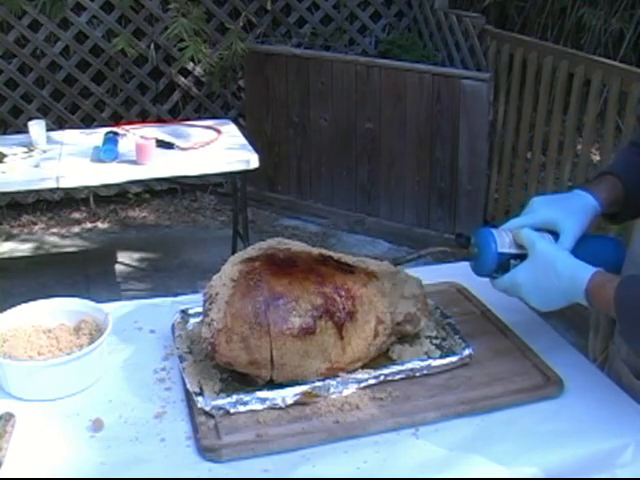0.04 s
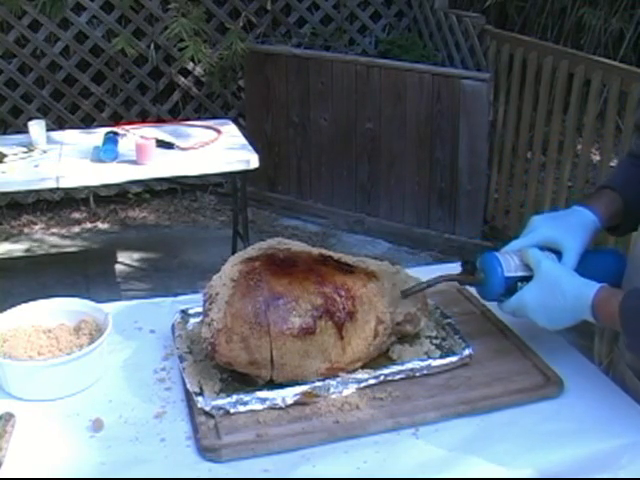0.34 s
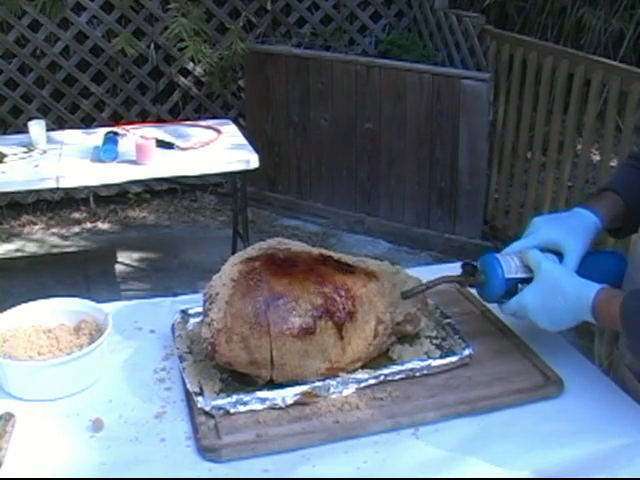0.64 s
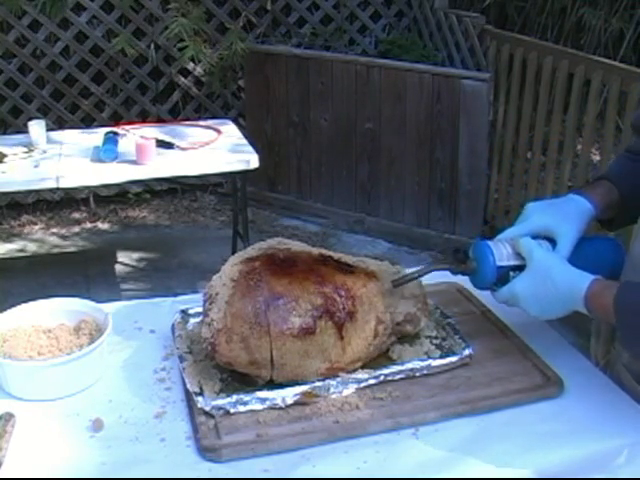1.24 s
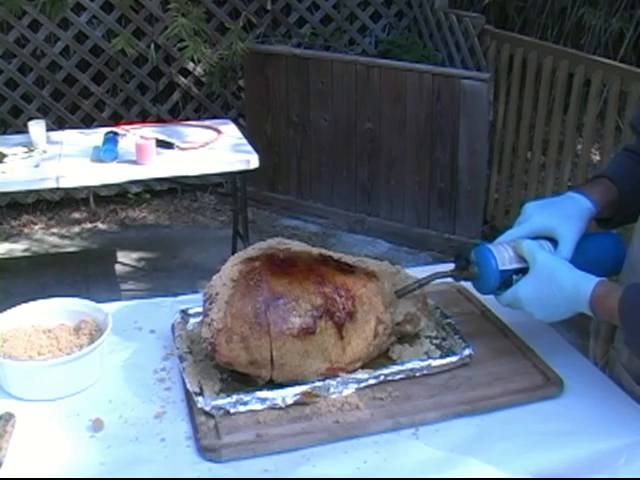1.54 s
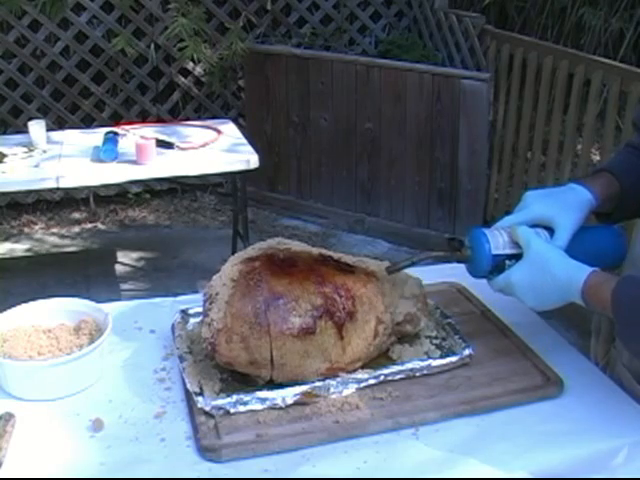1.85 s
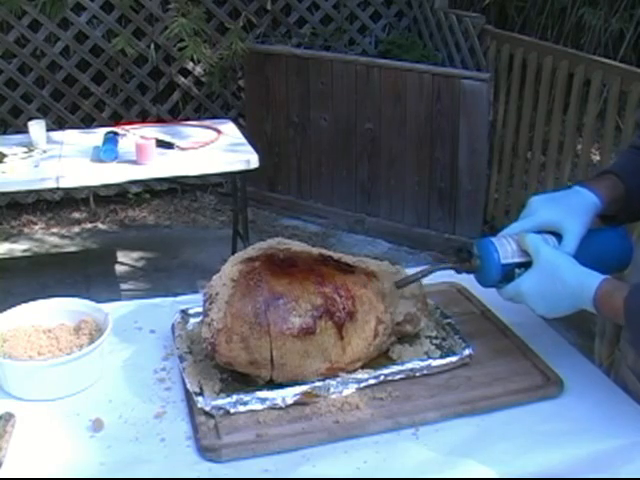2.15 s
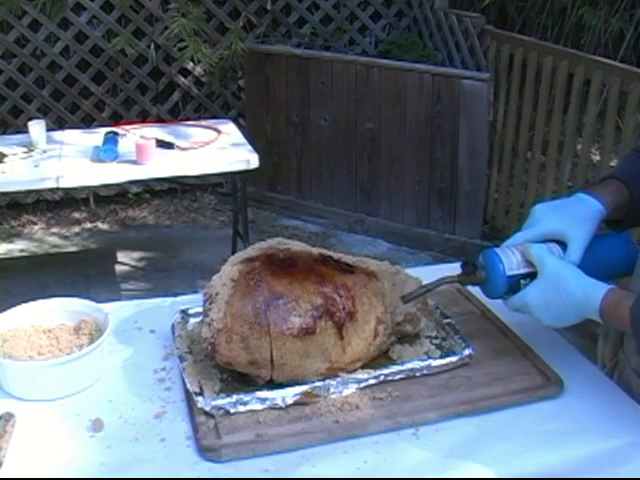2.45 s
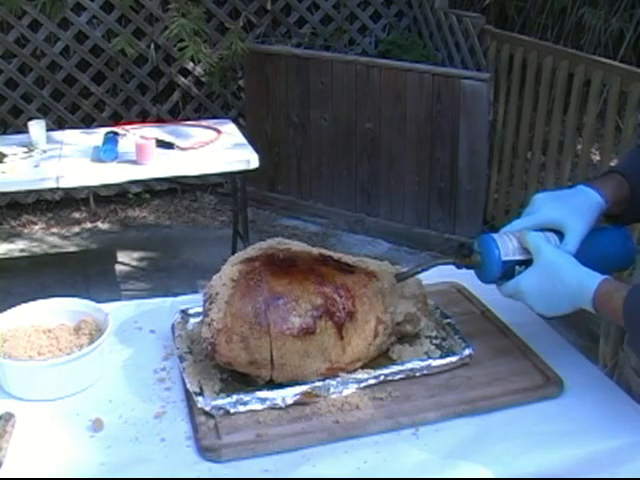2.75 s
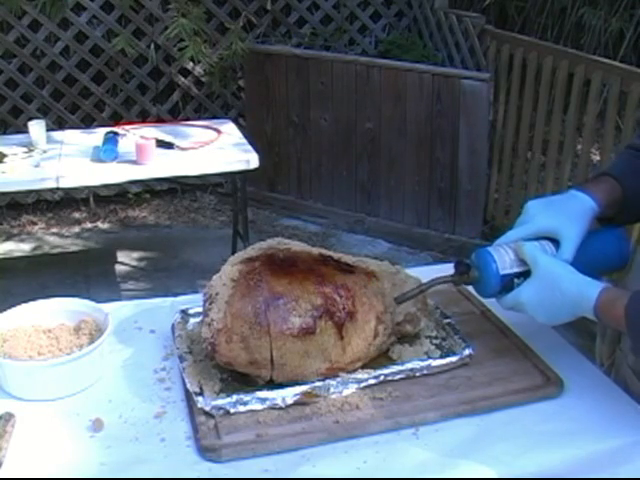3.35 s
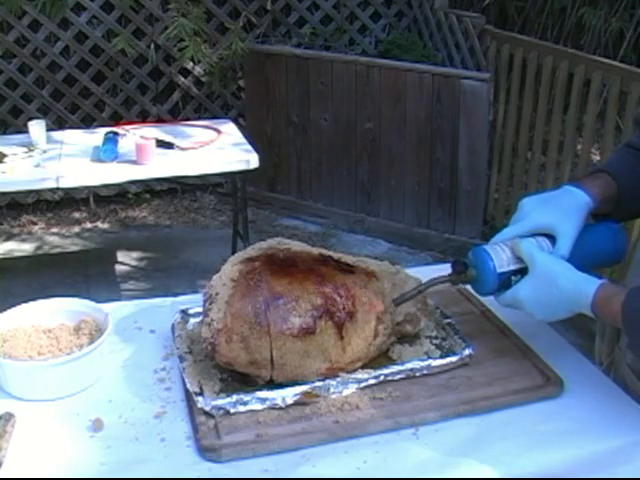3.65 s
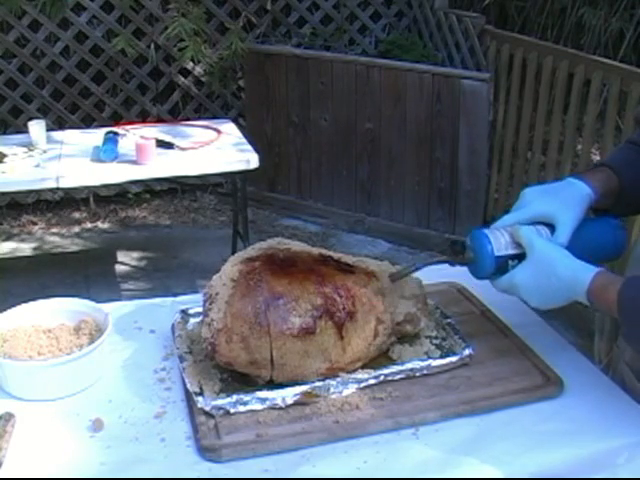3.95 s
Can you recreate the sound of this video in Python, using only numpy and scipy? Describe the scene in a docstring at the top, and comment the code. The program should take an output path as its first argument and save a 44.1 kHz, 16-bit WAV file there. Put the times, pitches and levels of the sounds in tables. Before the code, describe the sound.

Outdoors, a nearby blowtorch burns without a break, a fluttering rush with a high hiss. After about a second, melting sugar adds light sizzling and scattered tiny snaps, while a low rumble and far-off rotor throb continue underneath.

```python
"""Blowtorch on a sugared roast

A gas torch sweeps over a roast on a garden table: turbulence makes the flame roar, the flow rush over
the crust and the jet hiss. Interference with a reflection from a nearby surface shifts the colour as
the hand moves. Bubbles burst in the melting sugar, which sizzles and snaps. Far off, something like
a helicopter rotor throbs over a low outdoor rumble."""
import sys
import numpy as np
from scipy import signal
from scipy.fft import rfft, irfft, next_fast_len
from scipy.io import wavfile
from scipy.ndimage import uniform_filter1d, map_coordinates

SR = 44100
rng = np.random.default_rng(int(sys.argv[2]) if len(sys.argv) > 2 else 0)


def put_to_file(sound):
    """Save the sound as 16-bit audio at rate SR, in the file named by the first command-line argument."""
    columns = np.atleast_2d(sound).T  # one column per channel
    safe = np.clip(columns, -1, 1)
    whole_steps = np.round(safe * 32767)
    wavfile.write(sys.argv[1], SR, whole_steps.astype(np.int16))


N = 176400
TIME = np.arange(N) / SR


def amp(db):
    """Amplitude ratio of a level in decibels."""
    return 10 ** (np.asarray(db) / 20)


def unit(x):
    """Normalisation to an rms of 1."""
    return x / np.sqrt(np.mean(x ** 2) + 1e-20)


def decay(t, length):
    """Exponential damping: 60 dB down when t reaches length."""
    return np.exp(-np.log(1000) * t / length)


def along(points, hz):
    """Interpolation of (Hz, value) points on a logarithmic frequency axis."""
    knots_hz, values = np.transpose(points)
    return np.interp(np.log(hz + 1), np.log(knots_hz + 1), values)


def curves(rows):
    """Linear interpolation in time: one curve for each column after the first."""
    times, *columns = np.transpose(rows)
    return [np.interp(TIME, times, column) for column in columns]


def wobble(rate):
    """Smooth random modulation: a spline through rate knots a second."""
    knots = rng.standard_normal(int(N * rate / SR) + 4)
    return map_coordinates(knots, [TIME * rate])


def filtered(x, response):
    """Linear filtering: the spectrum of x times a frequency response."""
    size = 2 * next_fast_len(N)
    return irfft(rfft(x, size) * response(np.fft.rfftfreq(size, 1 / SR)), size)[..., :N]


def minimum_phase(points, hz):
    """Causality: a response with the given spectrum that rings only after its excitation."""
    cepstrum = irfft(np.log(amp(along(points, hz))))
    cepstrum[1:len(cepstrum) // 2] *= 2
    cepstrum[len(cepstrum) // 2 + 1:] = 0
    return np.exp(rfft(cepstrum))


# Likeness of the two channels. Each row: frequency in Hz, left-right correlation.
CORRELATION = [(100, 0.98), (200, 0.91), (700, .95), (2000, 0.94), (5000, 0.84), (9000, 0.66),
               (13000, 0.65)]
def noise(spectrum):
    """Partial coherence: stereo noise of rms 1, nearly mono in the bass."""
    def response(hz):
        angle = np.arccos(np.clip(along(CORRELATION, hz), 0, .999)) / 2
        return amp(along(spectrum, hz)) * [np.cos(angle), np.sin(angle)]
    mid, side = filtered(rng.standard_normal((2, N)), response)
    return unit(np.array([mid + side, mid - side]))


def drifting(x, depth_db):
    """Spectral modulation: narrow peaks and dips wander slowly through the sound."""
    frames = signal.stft(x, nperseg=512)[2]
    ripple = rng.standard_normal(frames.shape[1:])
    for _ in range(2):
        ripple = uniform_filter1d(ripple, size=6, axis=0, mode="wrap")  # across frequency
        ripple = uniform_filter1d(ripple, size=45, axis=1, mode="wrap")  # across time
    return unit(signal.istft(frames * amp(depth_db * unit(ripple)), nperseg=512)[1][:, :N])


# The sweep of the torch. Each row: time in seconds, then gains of roar, rush and jet in dB.
FLAME_GAINS = [(0, 1, 0.5, -1), (.25, 0, 0, -1), (.45, 1.5, -2.5, 1), (.7, -1.5, -3, 1.5),
               (.85, 0, -2.3, 0), (1.1, 0.5, -0.5, 2), (1.22, -1, -1.5, 1.5), (1.4, -1.5, 1, 3),
               (1.54, 1.5, 0, -2), (1.73, 1, 0, 1.5), (1.97, 1.5, -5, -0.5), (2.12, 1.5, 3.5, -1.5),
               (2.45, 3, 1.5, -0.5), (2.85, 2.5, 1, -4), (3.2, 2.5, 2, 2), (3.38, 1.5, -3, -1),
               (3.55, 2, 1, 0.5), (3.85, 4, 0.5, -0.5), (4, 2.5, 1, 3)]
# Brief spurts and lulls of the rush. Each row: time in seconds, change of level in dB.
RUSH_SPURTS = [(.44, 1.5), (.82, 3.5), (1.1, -7.5), (1.49, 3), (3.05, -0.5), (3.35, -1), (3.94, -6)]
# Spectra of burner, flow over the crust and gas jet. Each row: frequency in Hz, relative density in dB.
ROAR_SPECTRUM = [(120, -20), (200, -8), (320, -2.5), (400, -4), (450, -5), (540, -0.5), (680, 2),
                 (980, 2.5), (1080, -6.5), (1200, -6.5), (1800, -10.5), (4000, -75)]
RUSH_SPECTRUM = [(600, -14), (1100, -5.5), (1400, 0), (2200, -1), (3000, -1), (3400, -3), (3800, 1),
                 (4200, -4.5), (4700, -1), (7200, -8), (8100, -12), (9200, -11), (14000, -46)]
JET_SPECTRUM = [(5000, -14), (8200, -23), (9400, -2.5), (10500, -1), (12300, 0.5), (13500, -4),
                (14500, -9.5), (15700, -19.5)]
def flame():
    """Turbulence radiates broadband noise: a low roar, a rush and a high hiss, each fluttering."""
    roar_db, rush_db, jet_db = curves(FLAME_GAINS)
    spurt_width_s = .025
    rush_db += sum(db * np.exp(-((TIME - at) / spurt_width_s) ** 2) for at, db in RUSH_SPURTS)
    flicker = wobble(14) / 2  # common to rush and jet
    roar = amp(-37 + roar_db + .4 * wobble(39.97)) * noise(ROAR_SPECTRUM)
    rush_gain = amp(-36 + rush_db + 1.1 * (flicker + wobble(60)))
    rush = rush_gain * drifting(noise(RUSH_SPECTRUM), depth_db=1.06)
    jet_gain = amp(-43 + jet_db + 1.5 * (flicker + wobble(120)))
    jet = jet_gain * drifting(noise(JET_SPECTRUM), depth_db=2)
    return roar + rush + jet


# Hiss that glides as the torch turns. Each row: time in seconds, lower band's centre in Hz, gain in dB.
JET_GLIDE = [(0, 9900, -56), (.7, 10250, -46), (.85, 10400, -53), (1.3, 10680, -47), (1.75, 12050, -52),
             (2.6, 12270, -56), (3.2, 11900, -53), (3.6, 11200, -47), (3.85, 12200, -44), (4, 12000, -50)]
def jet_bands():
    """Modulation shifts narrowband noise up to two gliding centres, coloured by the jet's spectrum."""
    centre_hz, gain_db = curves(JET_GLIDE)
    width_hz, upper_ratio = 330, 1.24
    phase = 2 * np.pi * np.cumsum(centre_hz) / SR
    bands = np.zeros((2, N))
    for ratio in (1, upper_ratio):
        narrow = filtered(rng.standard_normal((2, N)), lambda hz: np.exp(-.5 * (hz / width_hz) ** 2))
        bands += unit((narrow.mean(0) + narrow / 2) * np.sin(ratio * phase)) / ratio ** 2
    return amp(gain_db) * filtered(bands, lambda hz: amp(along(JET_SPECTRUM, hz)))


# The nozzle's spectrum. Each row: frequency in Hz, relative density in dB.
NOZZLE_SPECTRUM = [(2000, -14), (3000, -14), (4200, -7.5), (4700, 3.5), (5300, 1.5), (6200, -3.5),
                   (7300, -5.5), (8300, -24), (12000, -31)]
def nozzle():
    """Turbulence at the nozzle gives a steady band of noise."""
    return amp(-41.5) * noise(NOZZLE_SPECTRUM)


# The reflection beside the flame. Each row: time in seconds, delay in ms, share of the direct sound.
NEAR_REFLECTION = [(0.0, 0.5, 0.16), (0.25, 0.46, 0.098), (0.45, 0.36, 0.52), (0.7, 0.36, 0.62),
                   (0.9, 0.42, 0.32), (1.1, 0.49, 0.33), (1.22, 0.42, 0.4), (1.5, 0.37, 0.53),
                   (1.75, 0.4, 0.18), (1.97, 0.54, 0.43), (2.12, 0.48, 0.29), (2.45, 0.35, 0.44),
                   (2.85, 0.47, 0.24), (3.15, 0.37, 0.34), (3.38, 0.34, 0.46), (3.55, 0.4, 0.38),
                   (3.85, 0.35, 0.52), (4.0, 0.414, 0.43)]
def with_reflection(direct, cutoff_hz=5600):
    """Comb filtering: the sound interferes with a duller copy whose delay follows the hand."""
    delay_ms, share = curves(NEAR_REFLECTION)
    delayed_index = np.arange(N) - delay_ms * SR / 1000
    dull = filtered(direct, lambda hz: 1 / (1 + (hz / cutoff_hz) ** 4))
    return direct + share * np.array([map_coordinates(side, [delayed_index]) for side in dull])


def blade_beats(shape, echo_db):
    """Periodic excitation: one pulse, shape(age, start), per blade, smeared by reverberation."""
    blade_hz, first_beat_s, scatter_db, echo_s = 9.6, .01207, 1.5, .2
    pulses, age = np.zeros(N + SR), np.arange(SR // 2) / SR
    for start in np.arange(first_beat_s, N / SR, 1 / blade_hz):
        strength = amp(scatter_db * rng.standard_normal())
        pulses[int(start * SR):][:len(age)] += strength * shape(age, start)
    tail = rng.standard_normal(len(age)) * decay(age, echo_s)
    echoes = signal.fftconvolve(pulses, tail / np.linalg.norm(tail))[:N]
    return unit(pulses[:N] + amp(echo_db) * echoes)


# The spectrum of the throb. Each row: frequency in Hz, relative level in dB.
THUMP_SPECTRUM = [(15, -35), (28.8, -10), (38.4, -7), (48, 5.5), (57.6, -5), (68, 3), (80, 0), (96, -4),
                  (120, -16.5), (200, -32), (500, -52)]
def rotor_thump(wall_delay_s=.0625, wall_share=.45):
    """Each blade's impulse rings at low frequency and returns by reflection from a wall."""
    impulses = blade_beats(lambda age, start: age == 0, echo_db=-11)
    thump = filtered(impulses, lambda hz: minimum_phase(THUMP_SPECTRUM, hz))
    return unit(thump + wall_share * np.interp(TIME - wall_delay_s, TIME, thump))


# Tones under the throb. Each row: frequency in Hz, level in dB.
DRONE_TONES = [(60.5, -55), (121.5, -68), (150, -53), (183, -51), (241, -51)]
def rotor_drone(waver_db=4):
    """Slow amplitude and phase modulation makes each low tone waver."""
    drone = np.zeros(N)
    for hz, db in DRONE_TONES:
        swell = amp(waver_db * wobble(2.08))
        drone += amp(db) * unit(swell * np.sin(2 * np.pi * hz * TIME + .5 * wobble(1.9)))
    return drone


# The falling pitch of the slaps. Each row: time in seconds, frequency in Hz.
SLAP_GLIDE = [(1.9, 300), (2.8, 253)]
def blade_slap(age, start, rise_s=.0024):
    """A damped oscillation of a few soft cycles, its pitch set by when it starts."""
    hz = np.interp(start, *np.transpose(SLAP_GLIDE))
    return age * np.exp(-age / rise_s) * np.sin(2 * np.pi * hz * age)


# The rotor's swells. Each row: time in seconds, thump level in dB, slap level in dB.
ROTOR_LEVELS = [(0, -35.5, -53), (.5, -46, -53), (.7, -43, -46.5), (1.17, -38.5, -39.5), (1.5, -41.5, -52),
                (1.9, -35, -41), (2.1, -40, -49), (2.3, -46, -64), (2.7, -41, -53), (2.83, -45, -42),
                (3.14, -49, -41), (3.5, -41, -47), (3.7, -40, -47), (4, -46, -47)]
def rotor():
    """Superposition of a deep throb, a drone and a blade slap that comes and goes."""
    thump_db, slap_db = curves(ROTOR_LEVELS)
    throb = amp(thump_db) * rotor_thump() + rotor_drone()
    return throb + amp(slap_db) * blade_beats(blade_slap, echo_db=-1)


# The outdoor background. Each row: frequency in Hz, relative density in dB.
RUMBLE_SPECTRUM = [(15, -18), (30, -9), (50, 3.5), (82, 4.5), (130, 0), (200, -5.5), (400, -10.5),
                   (1000, -36)]
# Its strength. Each row: time in seconds, level in dB.
RUMBLE_LEVELS = [(0, -37.5), (2, -38), (2.4, -40)]
def rumble():
    """Ambient noise with its energy concentrated in the bass."""
    return amp(curves(RUMBLE_LEVELS)[0]) * noise(RUMBLE_SPECTRUM)


def pop(age, hz, cycles=2.12):
    """A bursting sugar bubble is a heavily damped oscillator, silent within a few cycles."""
    return np.sin(2 * np.pi * hz * age) * decay(age, cycles / hz)


# Sizzling grows where the flame dwells on the sugar. Each row: time in seconds, gain in dB.
SIZZLE_GAINS = [(0, -55), (1.05, -50.5), (1.22, -40.5), (1.5, -71), (1.72, -41), (1.95, -51), (2.12, -42),
                (2.33, -41.5), (2.55, -50), (2.87, -46), (3.38, -45), (3.55, -56), (4, -43.5)]
def sizzle(pops_per_s=260, centre_hz=7500, range_db=7):
    """Shot noise: tiny pops of random time, size and pitch, scattered over the crust."""
    count = int(pops_per_s * N / SR)
    when, size, pitch, place = rng.random((count, 4)).T
    age = np.arange(SR // 500) / SR
    hz = centre_hz * np.exp(pitch - .5)
    pops = amp(-range_db * np.sqrt(size))[:, None] * pop(age, hz[:, None])
    index = (when * N).astype(int)[:, None] + np.arange(len(age))
    pan = place[:, None] - .5
    pair = [np.bincount(index.ravel(), (pops * gain).ravel(), N)[:N] for gain in (1 + pan, 1 - pan)]
    return amp(curves(SIZZLE_GAINS)[0]) * unit(np.array(pair))


# Snaps of the sugar. Each row: start in seconds, gain in dB, pitch in Hz, tail length in seconds.
SUGAR_SNAPS = [(1.1722, -23, 7500, .012), (1.2197, -14, 6500, .016), (1.6588, -19, 10000, .009),
               (1.7062, -20, 8000, .012), (1.7405, -19, 7000, .005), (1.8085, -18, 9000, .004),
               (2.0759, -15, 6000, .010), (2.1093, -17, 7000, .005), (2.134, -19, 9000, .007),
               (2.1616, -5, 7000, .004), (2.1971, -15.5, 7000, .007), (2.2981, -12.5, 11700, .007),
               (2.2992, -8.5, 7200, .007), (2.7743, -18, 3650, .022), (2.7746, -16.5, 4500, .021),
               (2.775, -9, 6500, .004), (2.8557, -17, 7000, .004), (2.8802, -21, 6500, .009),
               (3.4468, -18, 8000, .005), (3.5141, -18, 9000, .006), (3.8005, -17, 9000, .006),
               (3.8957, -18, 11000, .006)]
def snaps(ring_db=-13.5, splutter_db=-14.5):
    """Impulsive excitation: a loud pop leaves a tail of ringing crust and spluttering steam."""
    track, age = np.zeros((2, N + SR)), np.arange(SR // 20) / SR
    for start, db, hz, tail_s in SUGAR_SNAPS:
        steam = rng.standard_normal((2, len(age)))
        splutter = amp(splutter_db) * (steam.mean(0) + steam / 2)
        ring = amp(ring_db) * np.sin(2 * np.pi * hz * age)
        snap = 2 * pop(age, hz) + (ring + splutter) * decay(age, tail_s)
        track[:, round(start * SR):][:, :len(age)] += amp(db) * snap
    return track[:, :N]


# The colour of the sugar's sounds. Each row: frequency in Hz, gain in dB.
SUGAR_RESPONSE = [(500, -1), (2500, 0), (4300, 5.5), (5600, 0.5), (7200, 4.5), (9500, 1.5), (12000, 6),
                  (14500, -5), (16000, -7)]
def melting_sugar():
    """Source and filter: snaps and sizzle pass through the same resonances."""
    return filtered(snaps() + sizzle(), lambda hz: minimum_phase(SUGAR_RESPONSE, hz))


# The stereo balance. Each row: frequency in Hz, left minus right level in dB.
LEFT_BIAS = [(60, 0.5), (700, 1.1), (3000, 0.9), (6000, 0), (9000, 2.5), (15000, 3.5)]
def scene():
    """The sources add by superposition; a level difference places them a little to the left."""
    sugar = melting_sugar()
    torch = with_reflection(flame() + jet_bands() + nozzle())
    mix = torch + sugar + rotor() + rumble()
    return filtered(mix, lambda hz: amp(np.outer([.5, -.5], along(LEFT_BIAS, hz))))


def record(dry, top_hz=15900):
    """Band limiting: an ideal low-pass filter removes the highest treble."""
    return filtered(dry, lambda hz: hz < top_hz)


dry = scene()
out = record(dry)
put_to_file(out)
```